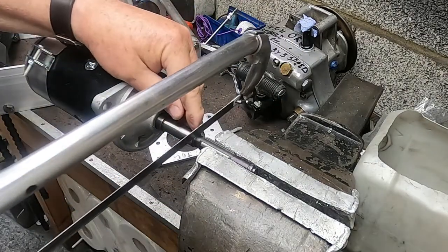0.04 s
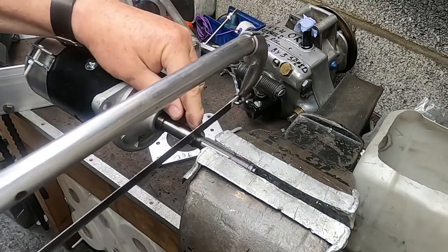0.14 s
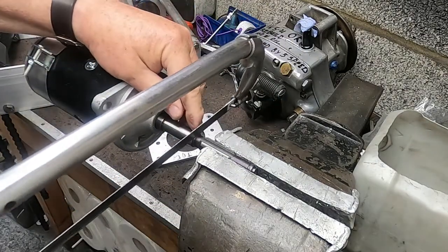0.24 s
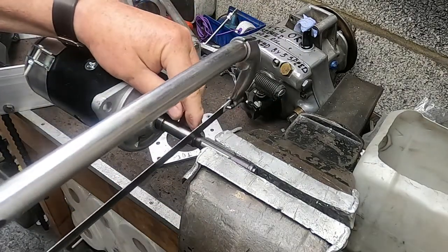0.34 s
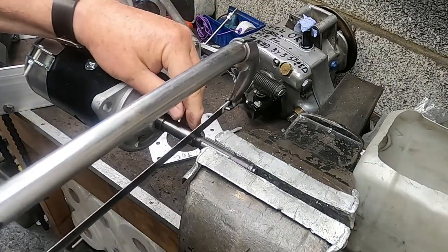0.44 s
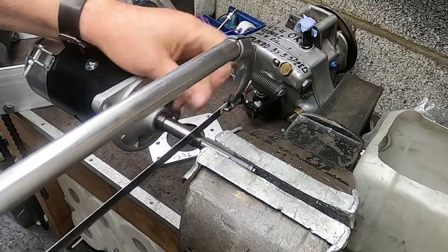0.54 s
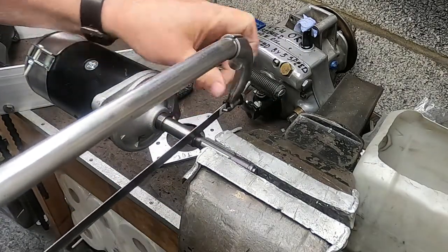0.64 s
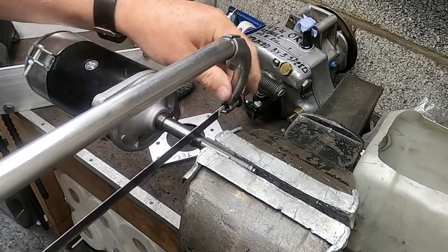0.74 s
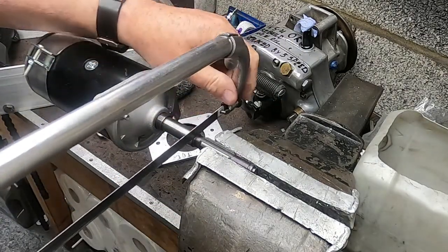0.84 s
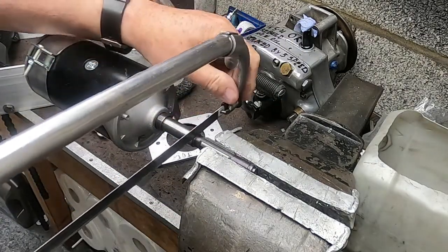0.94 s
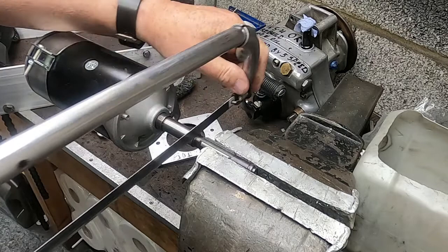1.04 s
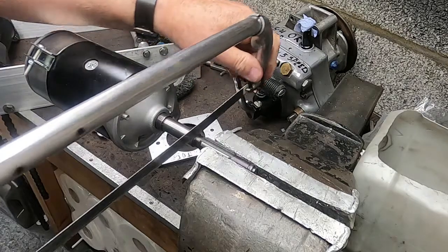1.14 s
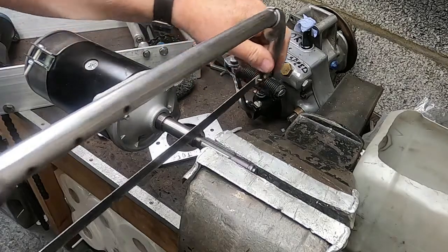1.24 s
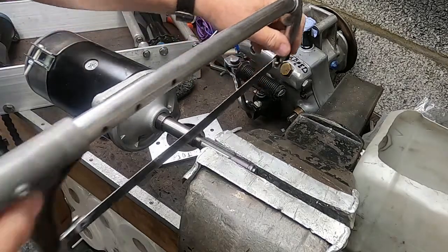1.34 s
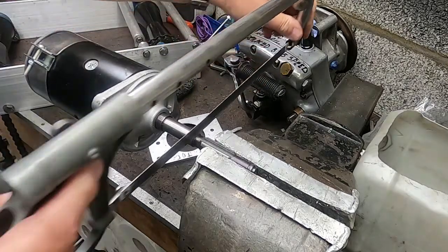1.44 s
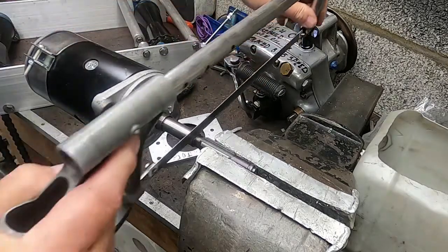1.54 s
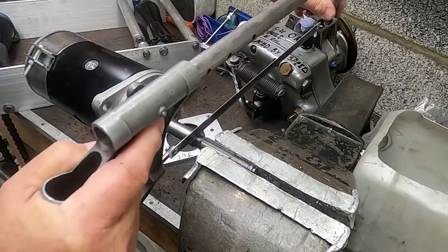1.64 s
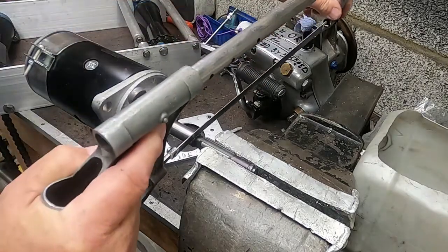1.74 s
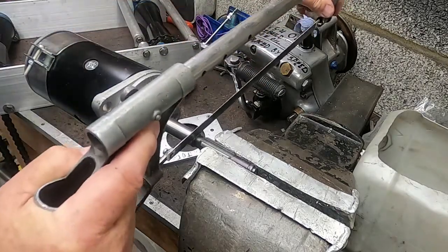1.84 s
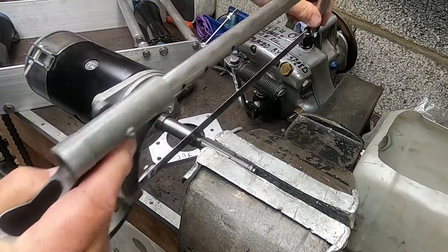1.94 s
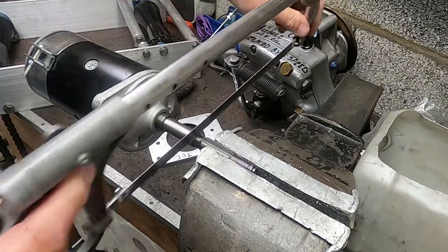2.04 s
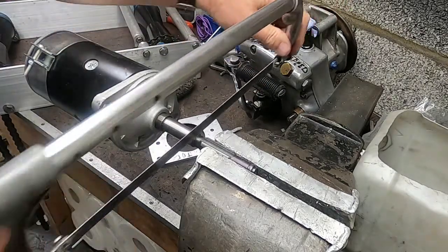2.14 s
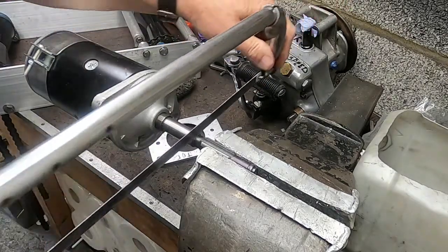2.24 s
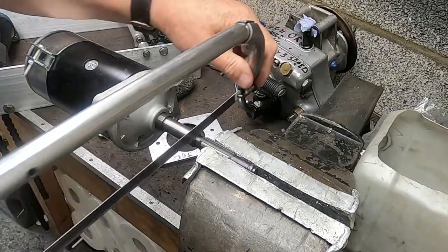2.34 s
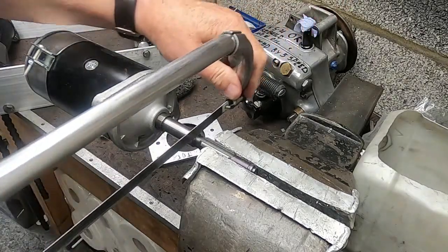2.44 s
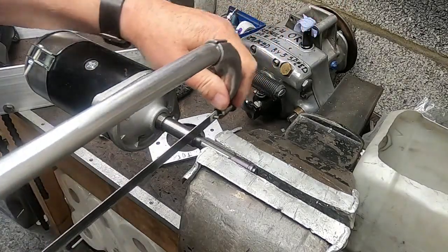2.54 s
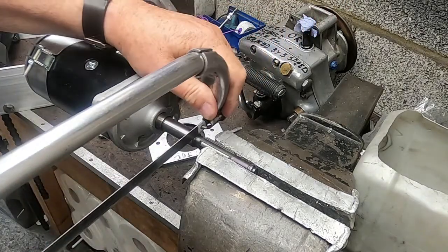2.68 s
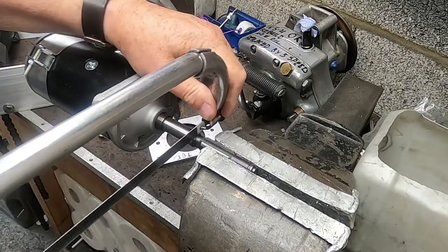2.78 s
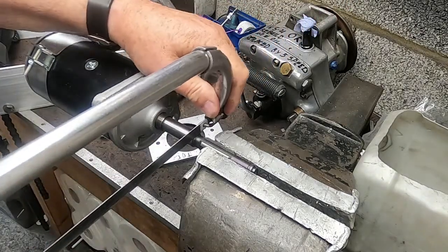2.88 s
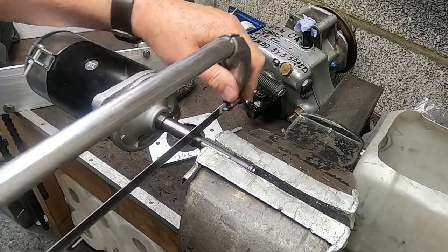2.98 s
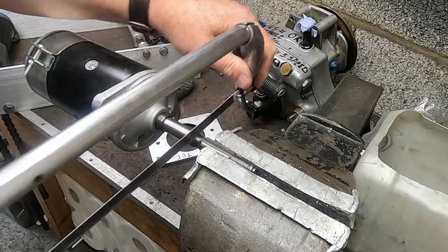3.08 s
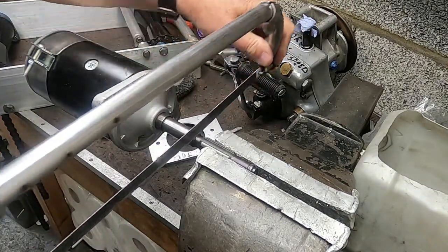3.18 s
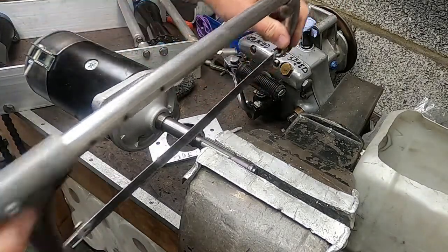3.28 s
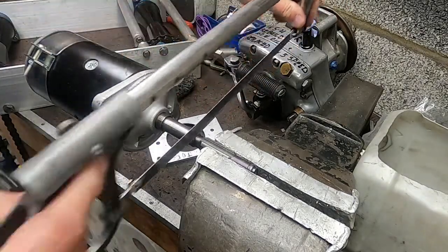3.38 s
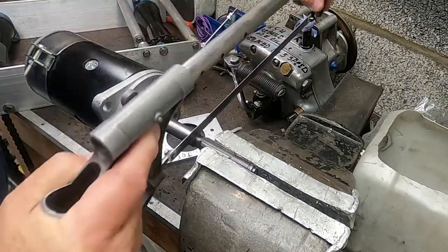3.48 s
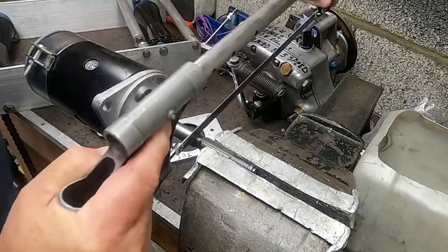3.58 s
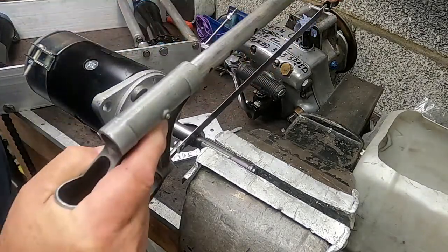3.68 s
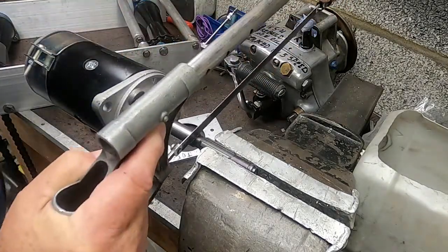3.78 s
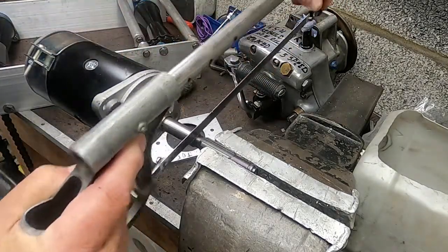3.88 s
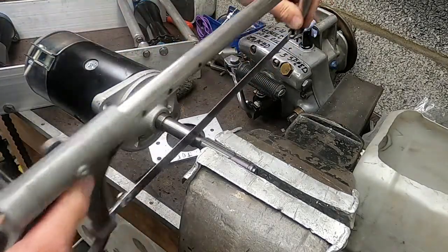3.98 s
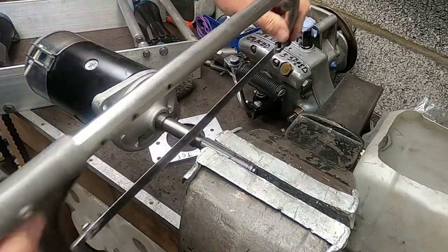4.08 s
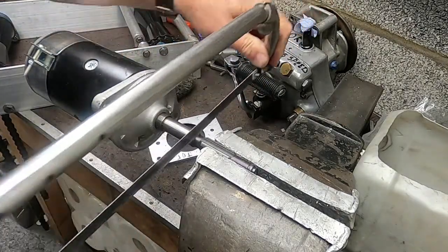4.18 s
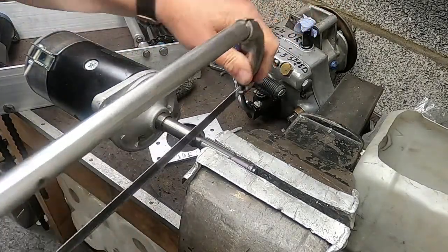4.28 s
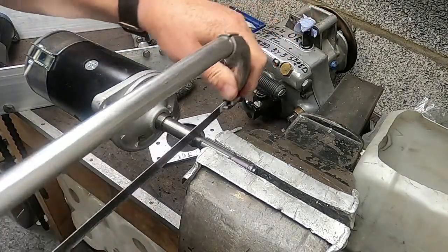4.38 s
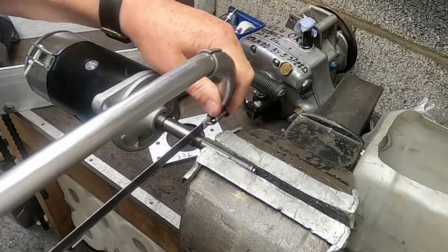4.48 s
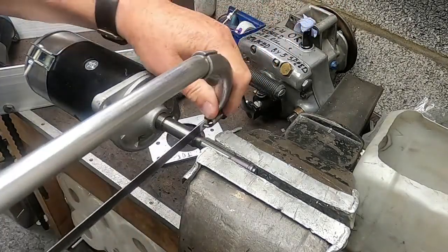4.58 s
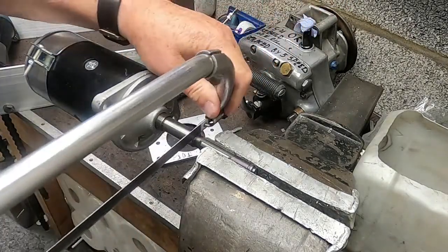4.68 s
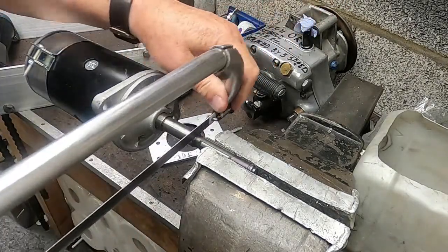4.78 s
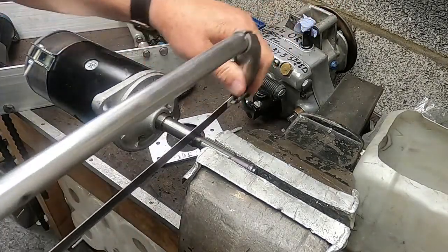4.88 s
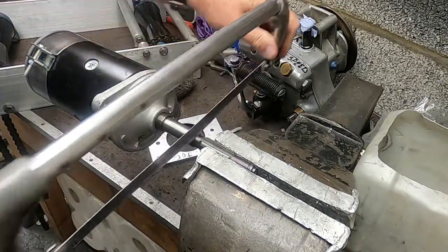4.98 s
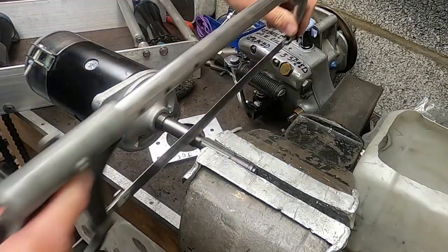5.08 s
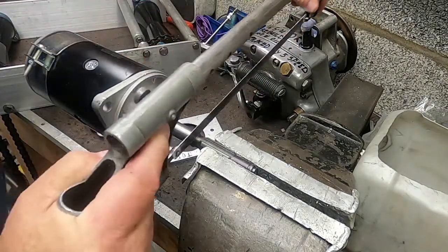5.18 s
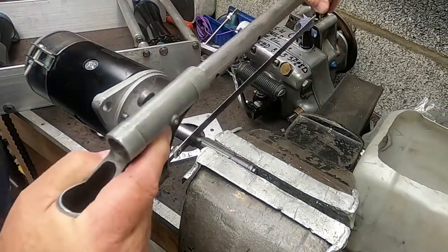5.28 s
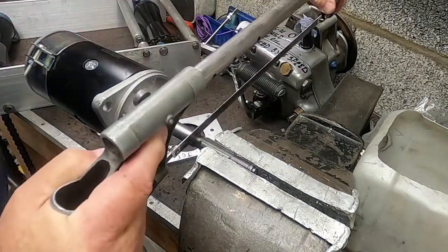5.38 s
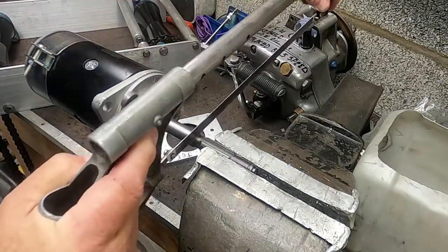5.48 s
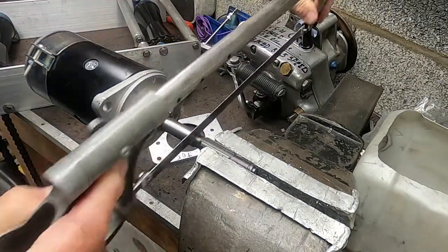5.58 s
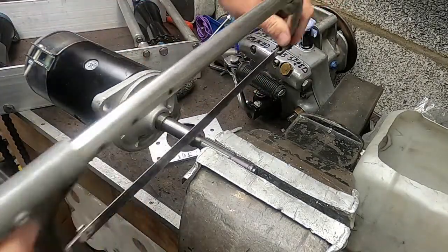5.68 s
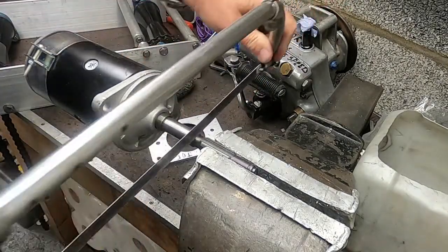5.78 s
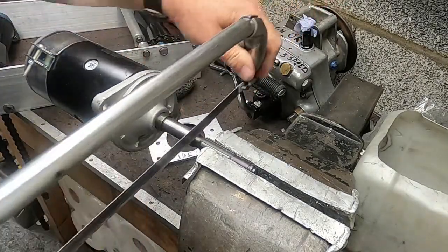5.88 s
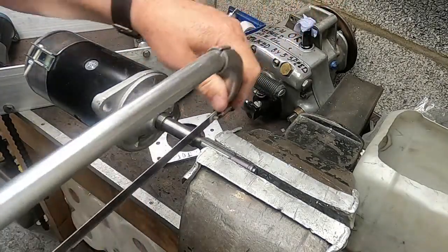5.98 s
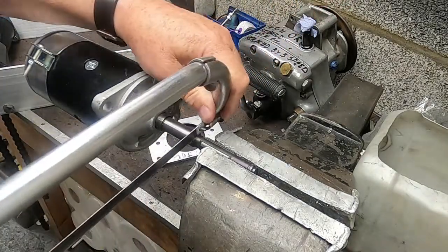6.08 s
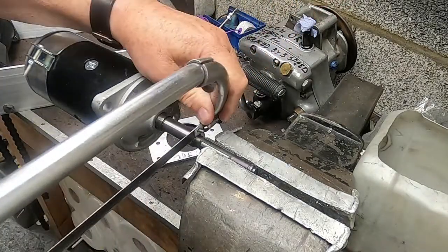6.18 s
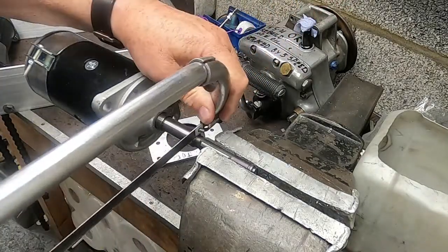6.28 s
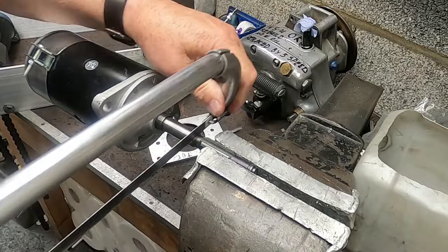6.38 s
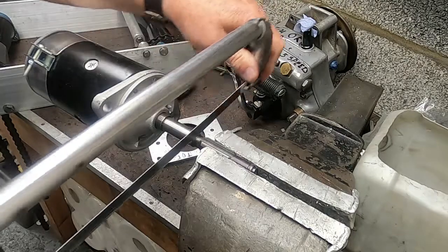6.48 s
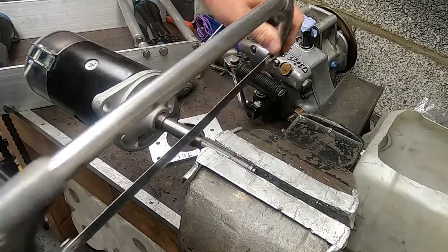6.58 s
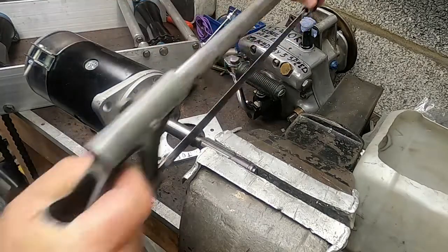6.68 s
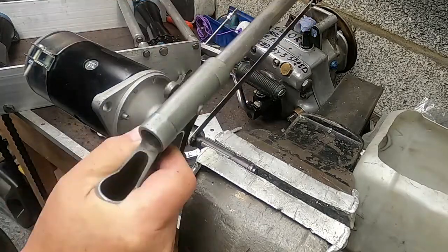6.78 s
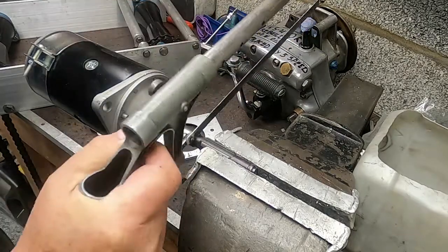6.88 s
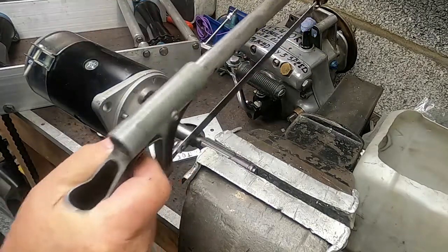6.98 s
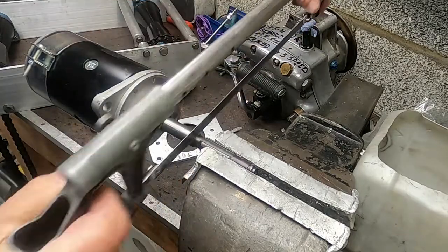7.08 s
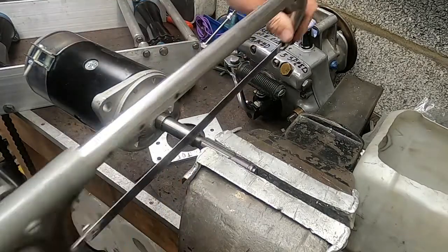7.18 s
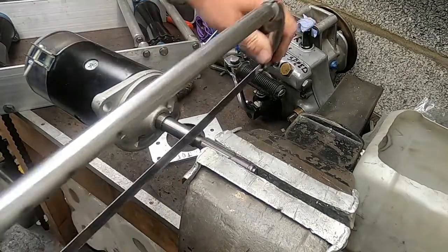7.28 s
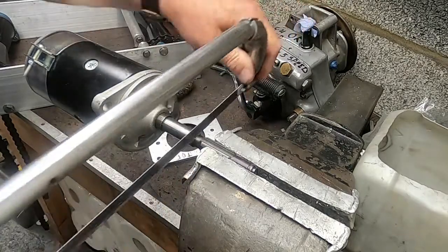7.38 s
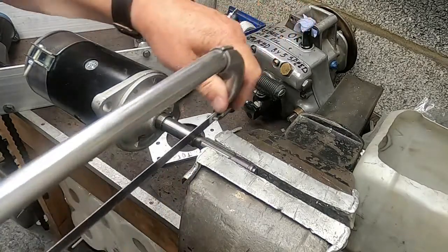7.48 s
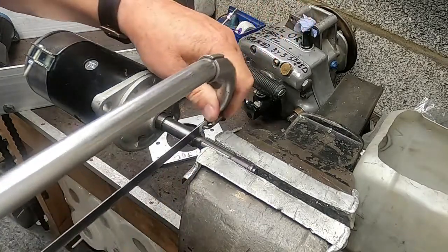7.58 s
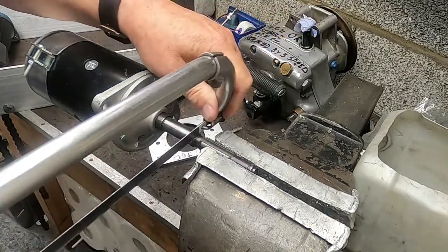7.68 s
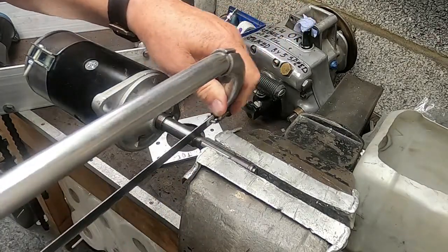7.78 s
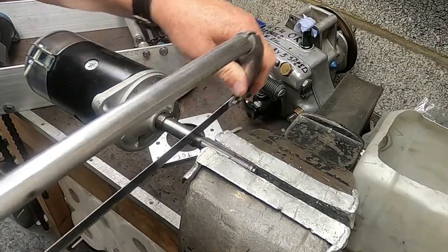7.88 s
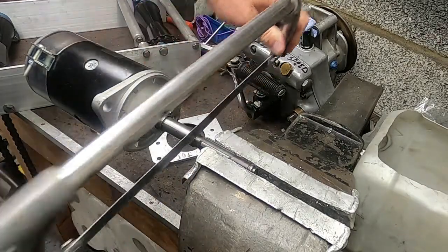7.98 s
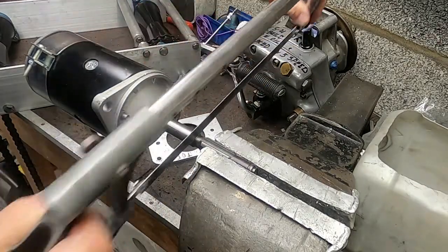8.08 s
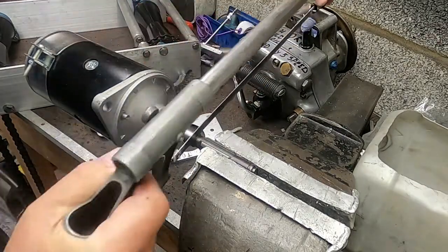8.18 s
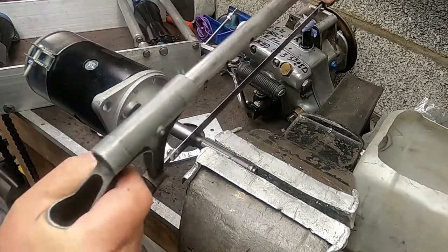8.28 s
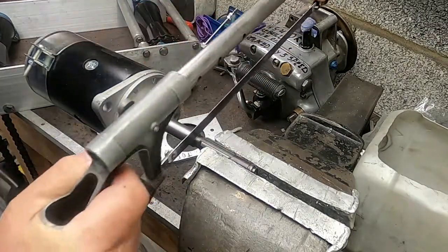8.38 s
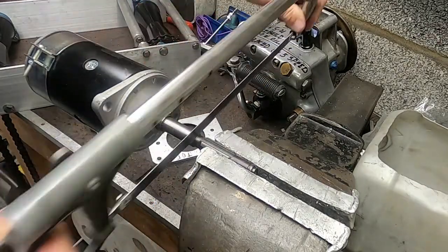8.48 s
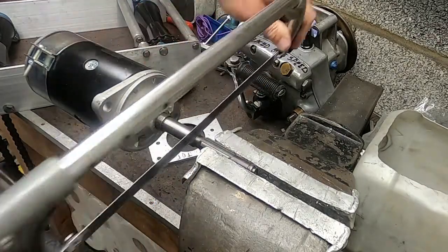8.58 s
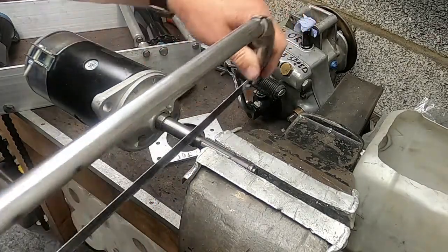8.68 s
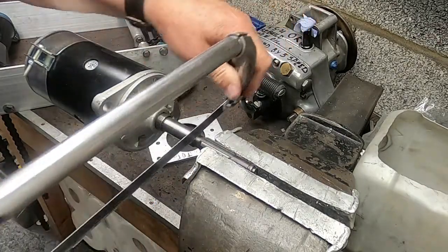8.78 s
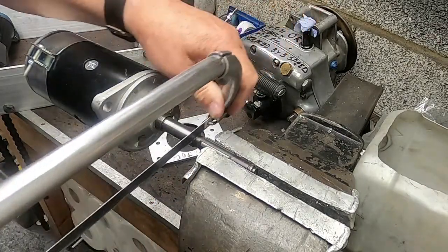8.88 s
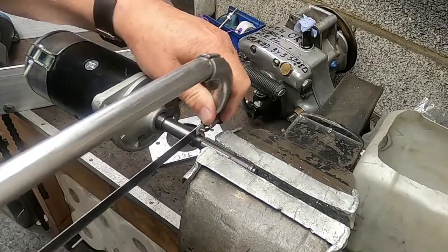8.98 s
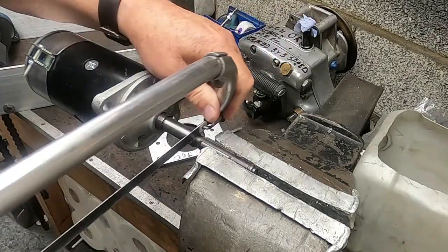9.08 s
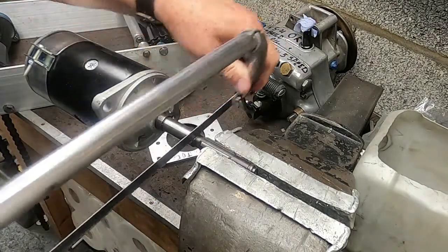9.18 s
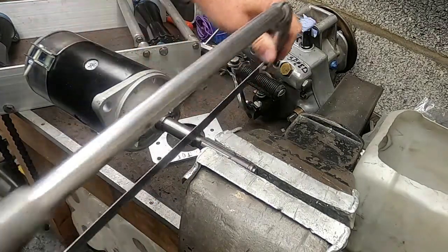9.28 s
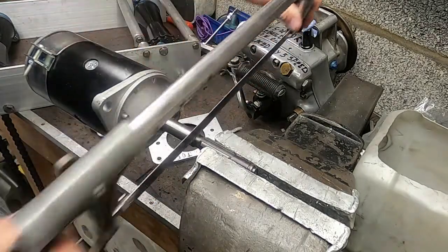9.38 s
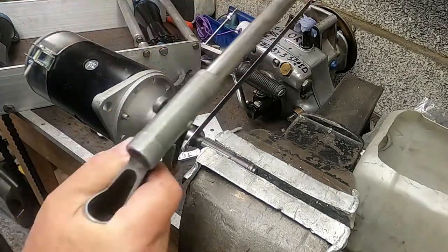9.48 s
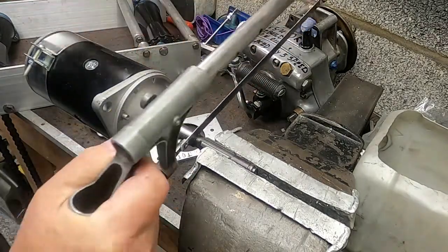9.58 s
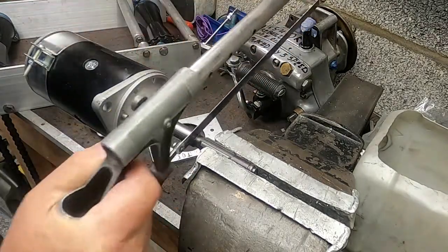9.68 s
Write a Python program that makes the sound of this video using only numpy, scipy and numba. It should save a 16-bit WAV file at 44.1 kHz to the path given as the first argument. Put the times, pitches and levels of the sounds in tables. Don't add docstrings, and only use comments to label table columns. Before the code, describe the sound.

A hacksaw blade taps and rubs lightly on steel, then saws in harsh, squealing, ringing push-pull strokes, close up in a small workshop.

```python
import sys
import numpy as np
from scipy import signal
from scipy.fft import rfft, irfft
from scipy.io import wavfile
from scipy.ndimage import uniform_filter1d, map_coordinates
from numba import njit

SR = 44100
rng = np.random.default_rng(int(sys.argv[2]) if len(sys.argv) > 2 else 0)


def makeup_ratio(level_db):
    decades = np.asarray(level_db, float) / 20
    return 10 ** decades


def log_audio(samples):
    frames = np.atleast_2d(samples).T
    limited = np.clip(frames, -1, 1)
    pcm = np.round(limited * 32767).astype(np.int16)
    wavfile.write(sys.argv[1], SR, pcm)


N = 429534

# time_s, level_db
TOUCH = [
    (0.0, -36.5),
    (0.07, -52),
    (0.2, -61),
    (0.3, -47),
    (0.45, -69),
    (0.76, -76),
    (0.79, -61),
    (0.86, -73.5),
    (1.0, -85),
]
# time_s, peak_db
TAPS = [
    (0.0248, -31),
    (0.1401, -35.5),
    (0.2119, -42),
    (0.2558, -38),
    (0.2887, -36),
    (0.3092, -32),
    (0.7816, -50),
]
# pitch_hz, width_hz, level_db
LOOSE_SAW = [(777, 17, -0.5), (1560, 40, -41), (1930, 93, 3), (2960, 140, -4.5), (3370, 120, -4),
             (4200, 49, -3), (4330, 40, -12), (5140, 39, -24), (5840, 20, -20), (6400, 53, -7)]
# pitch_hz, level_db (per Hz)
RUB_TONE = [(240, -65.5), (400, -13), (2290, -16.5), (2790, -5), (3010, -9), (4810, -4.5), (10100, -26),
            (15000, -39)]
# pitch_hz, level_db (per Hz)
HAND_TONE = [(800, -30), (2500, -7), (4800, 0), (8000, -2), (11000, -11), (14500, -14)]

# time_s, sway_db, boom_db
FREE_BENCH = [
    (0.0, -27, -43.5),
    (0.2, -32, -75),
    (0.37, -28.5, -48),
    (0.49, -31, -68),
    (1.0, -34, -64),
]
# sway_start_db, sway_braking_db, boom_start_db, boom_braking_db
JOLTS = [(-31.5, -31.5, -34, -29.5), (-36, -33, -31.5, -34), (-25.5, -22.5, -30.5, -32.5),
         (-28.5, -31, -29.5, -33), (-27.5, -26, -27.5, -28), (-27, -33.5, -31.5, -31.5),
         (-32.5, -31.5, -28, -33), (-28.5, -33, -31.5, -29.5), (-31.5, -31, -26.5, -32),
         (-33, -31.5, -38.5, -29.5), (-27.5, -22, -25.5, -39), (-28, -33, -32, -32)]
# pitch_hz, width_hz, level_db
BENCH_TOP = [(67.6, 9.7, -1.5), (107.8, 21, -1), (137.7, 12.3, 2), (218.6, 11.6, -7.5), (259, 6.5, -12),
             (310.3, 16, -16)]
# pitch_hz, level_db (per Hz)
HUSH_TONE = [(35, -27.5), (60, 2), (71, -10.5), (129, -18), (170, -38), (282, -46), (514, -67),
             (1270, -56.5), (15000, -86.5)]

# start_s, fastest_s, end_s, top_tooth_rate_hz, bite_db
STROKES = [(1.08, 1.46, 1.699, 1050, -27), (1.94, 2.26, 2.704, 1025, -26.5), (2.94, 3.36, 3.575, 1066, -25),
           (3.855, 4.15, 4.565, 1160, -25.5), (4.8, 5.07, 5.284, 1200, -22.5),
           (5.555, 5.76, 6.13, 1178, -23), (6.385, 6.68, 6.835, 1124, -21.5), (7.03, 7.3, 7.66, 1241, -23),
           (7.82, 8.1, 8.23, 1174, -21), (8.44, 8.66, 8.975, 1184, -21.5), (9.13, 9.4, 9.57, 1196, -20.5),
           (9.72, 9.95, 10.3, 1200, -22)]
# stopped_s, moving_again_s, creep_db
RESTS = [(0.9, 0.95, -78.5), (1.77, 1.877, -84), (2.85, 2.87, -74), (3.645, 3.785, -80),
         (4.66, 4.72, -76.5), (5.32, 5.49, -85.5), (6.23, 6.31, -88), (6.94, 6.96, -87), (7.69, 7.76, -60),
         (8.3, 8.39, -64.5), (9.06, 9.08, -76), (9.62, 9.67, -67.5), (10.4, 10.5, -80)]
# push_db, pull_db
SING_DB = [
    (0.5, -8),
    (4.5, -8),
    (-11.5, -5),
    (-6.5, 3),
    (4, 10.5),
]
# push_db, pull_db
SQUEAL_DB = [
    (-0.5, -0.5),
    (2.5, 4),
    (-1, -5.5),
]
# time_s, peak_db
SNAGS = [(1.1293, -10.5), (1.3199, -12.5), (1.4167, -4), (1.5334, -9), (2.2004, -4.5), (2.2603, -6.5),
         (2.4239, -10.5), (2.4798, -20), (3.0465, -8), (3.267, -7), (3.3373, -7.5), (4.135, -7.5),
         (4.353, -12), (4.8958, -6), (4.9232, -4), (4.9601, -0.5), (5.0325, -2), (5.7803, -4),
         (6.0242, 0.5), (6.54, -0.5), (6.556, -3.5), (6.586, -2.5), (6.6069, -2.5), (6.6523, -1.5),
         (7.444, -15), (7.9224, 0), (8.0686, -7), (9.2763, 0), (9.3392, -4), (9.3826, -7)]
# time_s, half_length_s, level_db
SLIPS = [
    (3.66, 0.05, -38.5),
    (5.37, 0.09, -65.5),
    (4.75, 0.044, -64.5),
    (8.35, 0.047, -62.5),
]
# pitch_hz, level_db (per Hz)
RASP_TONE = [(120, -28), (200, -4), (543, -13), (1770, -3.5), (1970, 12.5), (2540, -5), (4220, -2),
             (5060, -26.5), (6070, -19), (6760, -36.5), (12100, -38.5), (14500, -18), (15300, -43)]
# pitch_hz, width_hz, level_db
FRAME = [(426, 18.4, -3.5), (720.5, 8.2, -14), (1160, 110, -14.5), (1980, 97, 4), (2390, 270, -10.5),
         (2827, 63, -3), (3040, 233, -7.5), (4106, 31.4, 1.5), (4355, 37, 1), (4580, 137, -8),
         (5416, 110, -6)]
# pitch_hz, width_hz, level_db
HOLLOW_BAR = [(1333, 11, -10), (1160, 12, -5.5), (760, 24, -19.5), (428, 34, -8.5)]
# pitch_hz, depth_db
FLICKER_DEPTH = [(1000, 1.5), (6000, 2), (8500, 3.5), (11000, 5.5), (15000, 7)]

# time_s, knock_peak_db, tick_over_knock_db
KNOCKS = [(1.787, -51, 8), (1.921, -50, 18), (2.896, -46, 2), (2.922, -30.5, -4), (3.835, -51, 17),
          (4.772, -34, -2), (5.49, -41.5, -20), (5.546, -34.5, 10.5), (6.332, -45, -1), (6.362, -31.5, -2),
          (6.997, -45, 11.5), (7.048, -46, 1), (7.804, -27.5, -2), (8.434, -42, 9), (9.111, -31, -2),
          (9.706, -49, 11)]
# pitch_hz, level_db (per Hz)
KNOCK_TONE = [(150, -16.5), (500, -30.5), (1200, 6.5), (2000, -8), (2800, -11.5), (8000, -22), (15000, -69)]
# time_s, peak_db
NUDGES = [
    (3.7, -48),
    (5.36, -45),
    (6.34, -42),
    (6.92, -48),
    (9.11, -24),
]
# pitch_hz, level_db
THUD_TONE = [(120, -12.5), (250, 0), (700, -2), (1100, 5), (1500, -2), (2100, 3.5), (2500, -22),
             (9000, -40)]

# pitch_hz, fade_by_60_db_s
ECHO_TIME = [(200, 0.33), (2000, 0.11), (10000, 0.039)]
# pitch_hz, side_over_middle_db
STEREO_WIDTH = [(60, -25.5), (110, -25), (200, -24), (380, -22), (700, -14.5), (1280, -13), (2370, -10),
                (4370, -8.5), (8050, -5), (14900, -1.5)]
# pitch_hz, level_db
MIC_TONE = [(20, -0.5), (6500, -2), (9000, -1), (12000, -6.5), (13800, -11), (14600, -33.5), (15300, -48)]

SETTLE_S = (0.072, 0.044)
TAPER_SHARE = (0.55, 0.6)
ONSET_DB, SETTLED_DB, TAPER_DB, LAST_DB = (13, 10.5), (3.5, 3), (1, 2), (9, 14.5)
TRAIL_SHARE, TRAIL_DB = (0.45, 0.39), (28.5, 28.5)
FIRST_HZ, LAST_HZ = (340, 503), (388, 376)
STOP_HZ, STOP_DB = 170, -1
SING_GROWS = 0.7
SLOW_SQUEAL_HZ, FAST_SQUEAL_HZ = 6036, (5545, 5600)
CLIMB_HZ_PER_S = (39, 44)

JOLT_S = 0.12
MIDWAY_DB, RING_ON_DB = (0.5, -7), (-5, -8)
STILL_DB = (-44.5, -48)


def unit(x):
    return x / np.sqrt(np.mean(x ** 2) + 1e-20)


def along(points, hz):
    f, v = np.transpose(points)
    return np.interp(np.log(hz + 1), np.log(f + 1), v)


def curves(rows):
    s, *cols = np.transpose(rows)
    return [np.interp(np.arange(N) / SR, s, c) for c in cols]


def joined(rows):
    rows = np.array(rows, float)
    rows[:, 0] = np.maximum.accumulate(rows[:, 0])
    return curves(rows)


def wobble(rate):
    knots = rng.standard_normal(int(N * rate / SR) + 4)
    return map_coordinates(knots, [np.arange(N) * rate / SR], order=1)


def swell(s, half_s, db):
    place = np.clip((np.arange(N) / SR - s) / half_s, -1, 1)
    return makeup_ratio(db) * np.cos(np.pi / 2 * place) ** 2


def colour(x, points):
    gain = makeup_ratio(along(points, np.fft.rfftfreq(4096, 1 / SR)))
    cep = irfft(np.log(gain + 1e-6))
    cep[1:2048] *= 2
    cep[2049:] = 0
    return signal.fftconvolve(x, irfft(np.exp(rfft(cep))))[:len(x)]


@njit
def two_pole(x, turn, r):
    y = np.zeros(len(x))
    for i in range(2, len(x)):
        push = (1 - r * r) / 2 * (x[i] - x[i - 2])
        y[i] = push + 2 * r * turn[i] * y[i - 1] - r * r * y[i - 2]
    return y


def ring(x, hz, width_hz):
    turn = np.cos(2 * np.pi * np.clip(hz, 20, SR / 3) / SR) * np.ones(N)
    return two_pole(x, turn, np.exp(-np.pi * width_hz / SR))


def modes(x, table, flicker_db, rate, drift=0.0056):
    total = np.zeros(N)
    for k, (hz, width_hz, db) in enumerate(table):
        drive = x * makeup_ratio(db + flicker_db * wobble(rate))
        total += (-1) ** k * ring(drive, hz * (1 + drift * wobble(rate)), width_hz)
    return total


def grit(rate, spread_db):
    hit = rng.random(N) < rate / SR
    size = makeup_ratio(spread_db * rng.exponential(size=N))
    return unit(hit * rng.standard_normal(N) * size)


def bursts(rows, t60):
    x, t = np.zeros(N + SR), np.arange(SR // 4) / SR
    for s, db in rows:
        shape = makeup_ratio(-60 * t / t60) * rng.standard_normal(len(t))
        x[round(s * SR):][:len(t)] += makeup_ratio(db) * shape / np.abs(shape).max()
    return x[:N]


def smoothed(field, bands, frames):
    return uniform_filter1d(uniform_filter1d(field, size=bands, axis=0), size=frames, axis=1)


def patchy(x, depth_db):
    z = signal.stft(x, nperseg=512)[2]
    field = smoothed(rng.standard_normal(z.shape), bands=4, frames=7)
    return signal.istft(z * makeup_ratio(depth_db * unit(field)), nperseg=512)[1][:N]


def even(x):
    return x / np.sqrt(np.abs(uniform_filter1d(x ** 2, size=5000)) + 1e-12)


def moments():
    for k, (start, fast, end, top_hz, db) in enumerate(STROKES):
        yield k, k % 2, RESTS[k][1], start, fast, end, RESTS[k + 1][0], top_hz, db


def placing():
    before_sawing = np.arange(N) < TOUCH[-1][0] * SR
    rub = makeup_ratio(curves(TOUCH)[0]) * before_sawing * grit(12000, spread_db=3.5)
    contact = rub + makeup_ratio(4.5) * bursts(TAPS, t60=0.016)
    ringing = modes(contact, LOOSE_SAW, flicker_db=4, rate=20, drift=0.0073)
    scratch = patchy(colour(contact, RUB_TONE), depth_db=4)
    hand = swell(0.62, half_s=0.053, db=-52.5) * grit(12000, spread_db=2.0)
    return makeup_ratio(12.5) * ringing + makeup_ratio(4.5) * scratch + colour(hand, HAND_TONE)


def shaking():
    rows = list(FREE_BENCH)
    for moment, (sway_a, sway_b, boom_a, boom_b) in zip(moments(), JOLTS):
        k, way, before, start, fast, end, after, *_ = moment
        if k > 0:
            rows.append((before, *STILL_DB))
        sway_mid = (sway_a + sway_b) / 2 + MIDWAY_DB[0]
        boom_mid = (boom_a + boom_b) / 2 + MIDWAY_DB[1]
        rows += [(start + JOLT_S, sway_a, boom_a),
                 (fast, sway_mid, boom_mid),
                 (end - JOLT_S / 2, sway_b, boom_b),
                 (after, sway_b + RING_ON_DB[0], boom_b + RING_ON_DB[1])]
    return joined(rows)


def hum(hz, drift_hz, rate):
    return np.sqrt(2) * np.sin(2 * np.pi * np.cumsum(hz + drift_hz * wobble(rate)) / SR)


def bench():
    sway_db, boom_db = shaking()
    loaded = np.clip((np.arange(N) / SR - 1.0) / 0.19, 0, 1)
    free = hum(39.5, 1.17, rate=5.7)
    steady = hum(47.5, 1.55, rate=5)
    shaken = even(ring(rng.standard_normal(N), 43.5, width_hz=6.5))
    deep = unit(ring(rng.standard_normal(N), 27, width_hz=5))
    sway = (1 - loaded) * free + loaded * (0.88 * steady + 0.48 * shaken) + makeup_ratio(-17) * deep
    rumble = makeup_ratio(4.2 * wobble(30)) * rng.standard_normal(N)
    boom = even(modes(rumble, BENCH_TOP, flicker_db=5.0, rate=8))
    return makeup_ratio(sway_db) * sway + makeup_ratio(boom_db) * boom


def hush():
    return makeup_ratio(-40.0) * unit(colour(rng.standard_normal(N), HUSH_TONE))


def arm():
    bite, teeth, squeal = [], [], []
    for k, way, before, start, fast, end, after, top_hz, db in moments():
        bite += [(before, RESTS[k][2]),
                 (start, db - ONSET_DB[way]),
                 (start + SETTLE_S[way], db - SETTLED_DB[way]),
                 (fast, db),
                 (fast + TAPER_SHARE[way] * (end - fast), db - TAPER_DB[way]),
                 (end, db - LAST_DB[way]),
                 (end + TRAIL_SHARE[way] * (after - end), db - TRAIL_DB[way]),
                 (after, RESTS[k + 1][2])]
        first_hz, last_hz = FIRST_HZ[way], LAST_HZ[way]
        times = start, (start + fast) / 2, fast, (fast + end) / 2, end
        rates = first_hz, (first_hz + top_hz) / 2, top_hz, (top_hz + last_hz) / 2, last_hz
        harder_db = SING_GROWS * (db - STROKES[-1][-1])
        teeth.append((before, STOP_HZ, STOP_DB))
        teeth += [(s, hz, sing[way] + harder_db) for s, hz, sing in zip(times, rates, SING_DB)]
        teeth.append((after, STOP_HZ, STOP_DB))
        fast_hz = FAST_SQUEAL_HZ[way] + CLIMB_HZ_PER_S[way] * fast
        pitches = SLOW_SQUEAL_HZ, fast_hz, SLOW_SQUEAL_HZ
        squeal += [(s, hz, level[way]) for s, hz, level in zip(times[::2], pitches, SQUEAL_DB)]
    return joined(bite) + joined(teeth) + joined(squeal)


def saw():
    bite_db, tooth_hz, tooth_db, squeal_hz, squeal_db = arm()
    tooth_hz = tooth_hz * (1 + 0.06 * wobble(20))
    sawing = np.arange(N) > TOUCH[-1][0] * SR
    bite = makeup_ratio(bite_db) * sawing + sum(swell(*row) for row in SLIPS)
    chatter = makeup_ratio(1.34 * wobble(25) + 1.68 * wobble(110))
    scrape = bite * unit(chatter * grit(14000, spread_db=1.5))
    snaps = ring(bursts(SNAGS, t60=0.025), 5000, width_hz=6600)
    teeth = scrape + makeup_ratio(-2.5) * snaps

    rasp = patchy(colour(teeth, RASP_TONE), depth_db=3)
    frame = makeup_ratio(-8) * rasp + modes(teeth, FRAME, flicker_db=2.5, rate=18, drift=0.005)
    squeal_drive = teeth * makeup_ratio(squeal_db + 1.2 * wobble(30) + 1.0 * wobble(10))
    squeal_hz = squeal_hz * (1 + 0.028 * wobble(40) + 0.028 * wobble(8.3))
    squeal = ring(squeal_drive, squeal_hz, width_hz=242)

    song = ring(scrape * makeup_ratio(tooth_db + 2.1 * wobble(22)), tooth_hz, width_hz=250)
    song = ring(song, tooth_hz, width_hz=170)
    overtone = ring(scrape * makeup_ratio(tooth_db + 2.7 * wobble(19)), 2 * tooth_hz, width_hz=530)
    bar = modes(makeup_ratio(12) * song + makeup_ratio(-2.5) * scrape, HOLLOW_BAR, flicker_db=2.0, rate=10)
    sound = frame + makeup_ratio(-0.5) * squeal + makeup_ratio(-9.5) * song + makeup_ratio(-16.0) * overtone + bar
    return makeup_ratio(1.13) * sound * np.linalg.norm(bite) / np.linalg.norm(sound)


def flickering(x):
    hz, _, z = signal.stft(x, SR, nperseg=1024)
    field = smoothed(rng.standard_normal(z.shape), bands=3, frames=3)
    depth_db = along(FLICKER_DEPTH, hz)[:, None]
    mean_db = depth_db ** 2 * np.log(10) / 20
    return signal.istft(z * makeup_ratio(depth_db * unit(field) - mean_db), nperseg=1024)[1][:N]


def turns():
    knock = colour(bursts([(s, db) for s, db, _ in KNOCKS], t60=0.13), KNOCK_TONE)
    tick = colour(bursts([(s, db + rel) for s, db, rel in KNOCKS], t60=0.024), RUB_TONE)
    bell = ring(bursts(NUDGES, t60=0.086), 1310, width_hz=69)
    bell = ring(bell, 1310, width_hz=7.7)
    return makeup_ratio(37) * bell + makeup_ratio(10) * knock + makeup_ratio(15.0) * tick


def thud():
    return makeup_ratio(12.5) * colour(bursts([(1.789, -34.5)], t60=0.13), THUD_TONE)


def workshop_echo(near):
    hz, t, z = signal.stft(rng.standard_normal(SR // 2), SR, nperseg=256)
    fade = makeup_ratio(-60 * t / along(ECHO_TIME, hz)[:, None])
    tail = signal.istft(z * fade, SR, nperseg=256)[1]
    late = np.pad(near, (300, 0))
    return makeup_ratio(-12.0) * signal.fftconvolve(late, tail / np.linalg.norm(tail))[:N]


def scattered(x):
    z = signal.stft(x, nperseg=256)[2]
    paths = rng.standard_normal(z.shape) + 1j * rng.standard_normal(z.shape)
    paths = smoothed(paths, bands=3, frames=20)
    return signal.istft(z * paths / np.abs(paths), nperseg=256)[1][:N]


def scene():
    near = placing() + flickering(saw()) + turns() + thud()
    mid = near + workshop_echo(near) + hush() + bench()
    side = colour(makeup_ratio(4.0) * scattered(mid), STEREO_WIDTH)
    return np.array([mid + side, mid - side])


def roll_off(x):
    return signal.sosfilt(signal.butter(12, 15460, fs=SR, output="sos"), x)


def record(dry):
    mix = np.array([colour(channel, MIC_TONE) for channel in dry])
    return roll_off(mix)


dry = scene()
out = record(dry)
log_audio(out)
```